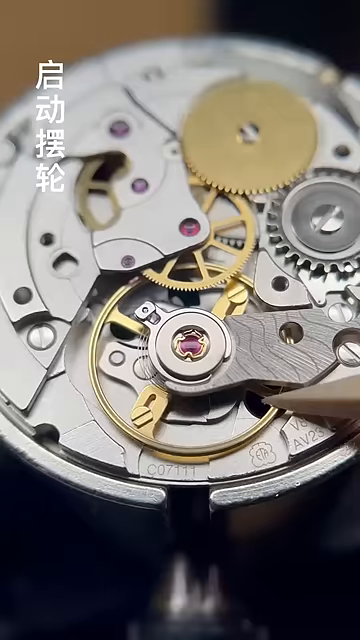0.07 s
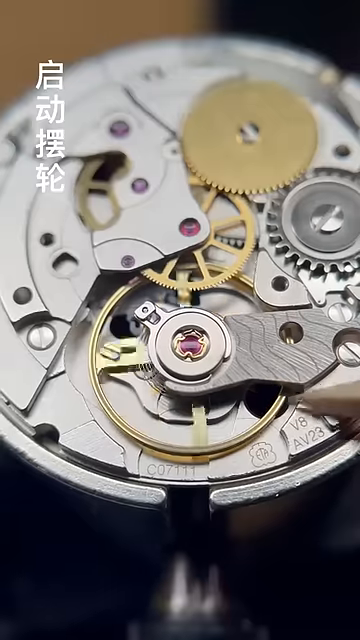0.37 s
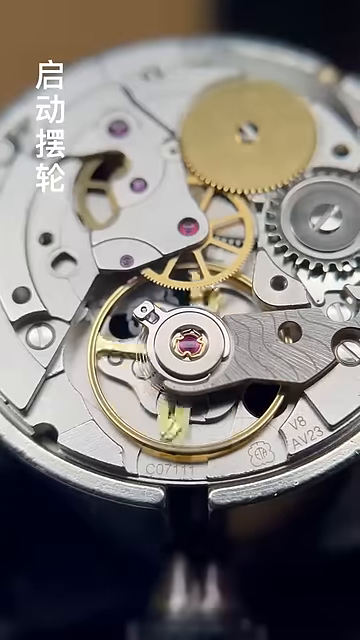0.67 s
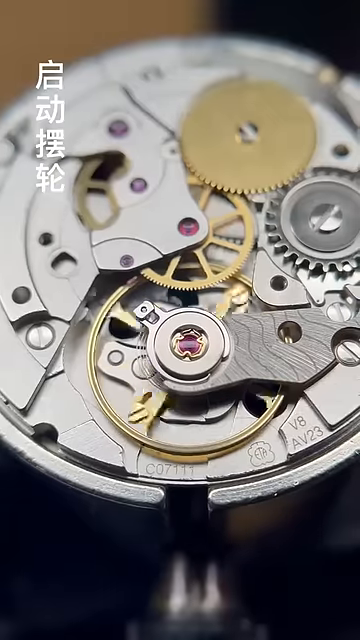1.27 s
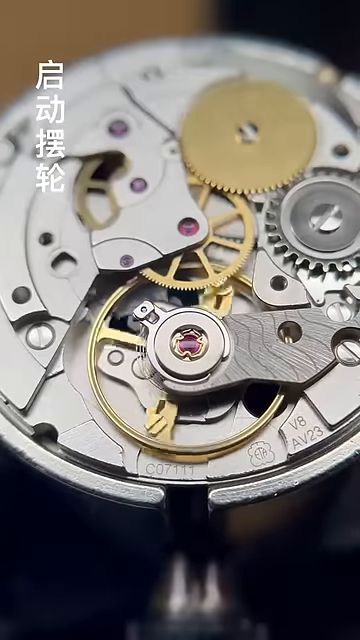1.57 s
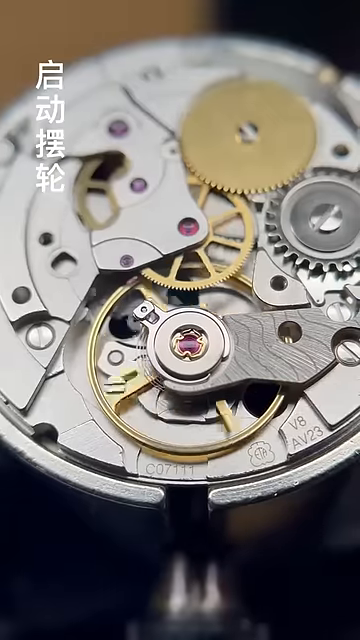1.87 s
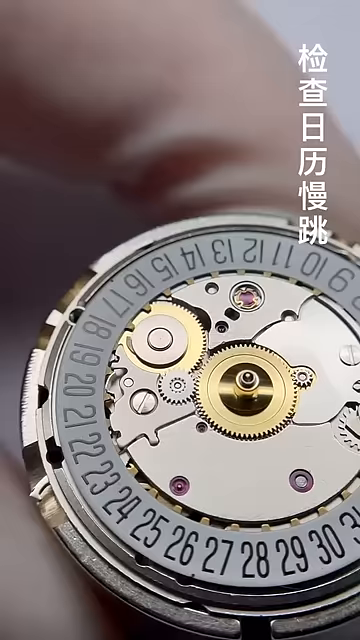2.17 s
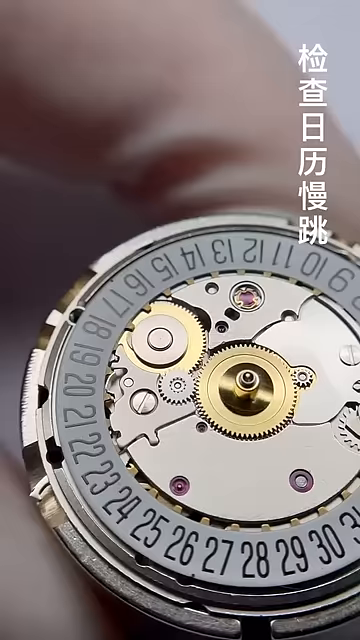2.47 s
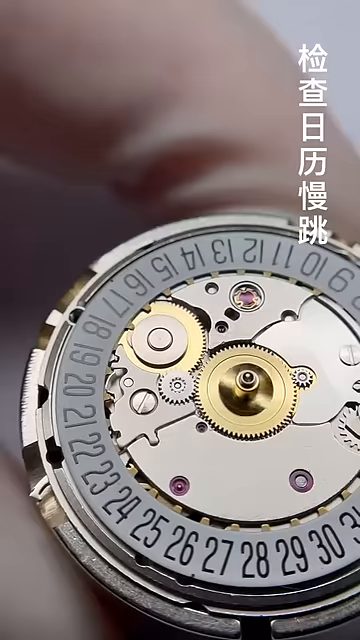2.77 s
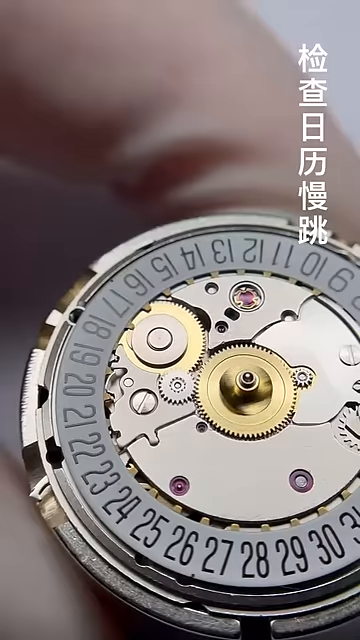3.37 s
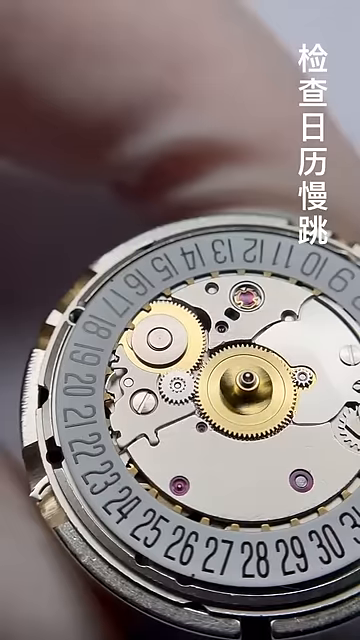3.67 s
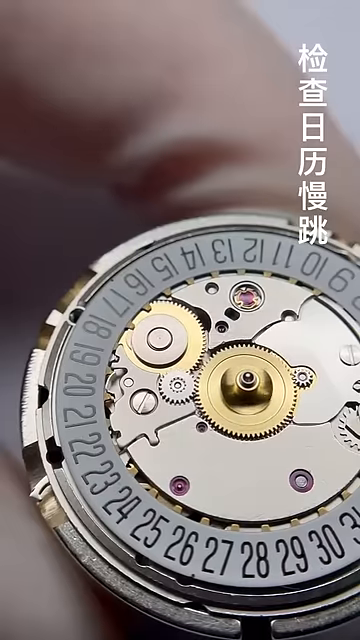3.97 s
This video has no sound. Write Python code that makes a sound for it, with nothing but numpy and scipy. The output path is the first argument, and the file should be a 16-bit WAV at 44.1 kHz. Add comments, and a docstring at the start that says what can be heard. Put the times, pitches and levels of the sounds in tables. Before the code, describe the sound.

A mechanical watch starts ticking, quick and metallic, over a faint hiss and hum. The ticking stops, and fingers turn the crown in five soft, scratchy strokes with dull handling bumps and two tiny snaps, close up in a quiet room.

```python
"""A quiet room, a watch movement on a pickup stand. A stick frees the balance; the escapement ticks six
times a second, each tick a double steel click with a thin spring ring, over the stand's resonant hiss
and faint mains hum. After a short silence the watch is in the hand: five finger strokes on the crown
turn the calendar gears, with soft double scrapes, handling rumble and two small snaps."""
import sys
import numpy as np
from scipy.fft import rfft, irfft, next_fast_len
from scipy.io import wavfile

SR = 44100
rng = np.random.default_rng(int(sys.argv[2]) if len(sys.argv) > 2 else 0)


def wav_out(sig):
    """Save sig, one row per channel (or a flat mono array), as 16-bit PCM at SR to the path in sys.argv[1]."""
    wavfile.write(sys.argv[1], SR, np.round(np.clip(np.atleast_2d(sig).T, -1, 1) * 32767).astype(np.int16))


N = 176400

# Ticks: (time [s], unlock [dB], wait for drop [s], drop [dB], rebound [dB], spring [dB],
# spring t60 scale [ratio], knock [dB])
TICKS = [(0.3753, -29, 0.012, -26.5, -38, -50, 0.67, -47),
         (0.5415, -32.5, 0.012, -30.5, -33.5, -53, .6, -42.5),
         (0.709, -30, .0114, -29.5, -39.5, -52.5, 0.99, -46),
         (0.876, -26, .0105, -29.5, -34.5, -58, 0.62, -51), (1.0427, -28, 0.01, -30, -34.5, -56.5, 1, -39),
         (1.2091, -33.5, 0.011, -28.5, -35.5, -55.5, 1, -36),
         (1.3761, -29.5, .0098, -35, -36.5, -51, 1, -43),
         (1.5431, -29, .0095, -30.5, -35.5, -54, 0.54, -46),
         (1.7092, -30, 0.0096, -30, -37.5, -49, 0.93, -47),
         (1.8763, -30.5, 0.0091, -33, -33.5, -51, .8, -44)]
# Movement on its stand: (frequency [Hz], level [dB], t60 [s], extra at tooth drop [dB])
MOVEMENT_MODES = [(2690, -17.5, 0.017, 2), (3010, -20, 0.015, -11), (3540, -24, 0.0068, 9),
                  (4340, -25, .012, -25), (4645, 7.5, 0.0095, -3.5), (4744, -14, 0.045, 1.5),
                  (5350, -24, 0.012, 12), (6405, -31, 0.029, 11), (7620, -25, 0.026, 5),
                  (8480, -24, 0.022, 1), (9530, -18.5, 0.014, 3.5), (10900, -25.5, 0.012, 1),
                  (12960, -28, .01, 11.5), (15250, -30, 0.013, 3)]
# Spring, calendar steel, case: (frequency [Hz], level [dB], t60 [s])
SPRING_MODES = [(7560, -2.5, 0.24), (7630, -13, 0.12), (6350, -11.5, 0.11), (9100, -12, 0.098),
                (9650, -11, 0.073), (4580, -2, .1), (15130, -19, 0.12)]
SNAP_MODES = [(8600, 7, 0.01), (9000, -13, .009), (9200, -14, .007), (7000, -19, .012), (13520, -6, .012),
              (14000, -14, .008)]
CASE_MODES = [(1400, -8.5, 0.011), (1830, -11.5, 0.0096), (2150, -16, .008), (2620, -4.5, .011),
              (3190, -3.5, 0.017), (3400, -16, 0.013), (5660, -13, 0.0094)]
# Crown strokes: (push centre [s], push [dB], push half width [s], wait for scrape [s], scrape [dB],
# run-out [dB])
STROKES = [(2.274, -62, 0.019, 0.056, -59.5, -68), (2.619, -59, 0.012, 0.059, -61.5, -71.5),
           (2.962, -61, 0.0084, 0.047, -61.5, -67), (3.314, -58, 0.0097, 0.051, -60.5, -75),
           (3.667, -61.5, 0.0082, 0.051, -61, -71)]
# Calendar snaps: (time [s], level [dB], case gain [dB], ring [Hz], ring gain [dB], crack gain [dB])
SNAPS = [(2.6913, -47, -30, 7770, -5, 1), (3.7727, -42.5, 2.5, 8200, -20, -15)]
# Crown catches, finger bumps on the case: (time [s], level [dB])
CATCHES = [(2.2795, -50.5), (2.622, -56), (2.9613, -54.5), (3.314, -56), (3.6675, -56)]
BUMPS = [(2.039, -55.5), (2.28, -43), (2.622, -44), (2.716, -53), (2.962, -50), (3.085, -51),
         (3.312, -51.5), (3.402, -45.5), (3.44, -50), (3.667, -50), (3.858, -55)]
# Rubs at the balance, touches on the metal: (centre [s], half width [s], level [dB])
BALANCE_RUBS = [(.36, 0.042, -56), (.43, 0.04, -58), (0.606, 0.051, -54.5)]
TOUCHES = [(.312, 0.015, -63), (2.145, 0.019, -77), (2.36, 0.027, -75), (3.07, 0.041, -76),
           (3.95, .03, -76)]
# Envelope of a soft low rush: (time [s], level [dB])
RUSH_ENVELOPE = [(0, -65.5), (.2, -61), (.5, -60), (.7, -62.5), (.95, -69), (1.4, -76), (2, -100)]
# Impact spectra: (frequency [Hz], gain [dB])
CRACK_EQ = [(1000, -30), (2300, -20), (2700, -24), (3350, -7), (3800, -2.5), (4600, -1), (5400, 2),
            (5900, -18), (7200, -17), (8000, -20), (9550, 5), (10200, -21), (11400, -18), (12150, -7),
            (12600, -10), (13100, -3), (14200, -26), (14750, 8.5), (15300, -10), (15700, -14)]
KNOCK_EQ = [(500, -40), (1100, -19), (2000, -3.5), (2400, -14), (2700, 5), (3300, -9), (3900, -5.5),
            (6000, -35), (12000, -35)]
CATCH_EQ = [(200, -3), (550, 5.5), (1300, -8), (2200, -13), (3400, -9), (4800, -15), (8700, -7),
            (14000, -20)]
BUMP_EQ = [(30, 5.5), (100, 2), (200, -11.5), (350, -24), (900, -28), (2500, -38), (6000, -60)]
# Friction spectra: (frequency [Hz], gain [dB])
PUSH_EQ = [(300, -2.5), (900, 6), (2200, -7), (3300, -8.5), (4800, -8), (7200, 2.5), (8000, -1),
           (8800, 5.5), (10800, -9), (13500, 0), (15400, -14)]
SCRAPE_EQ = [(1000, -9), (4800, -15), (6200, -7), (7300, 0.5), (7900, -7.5), (8700, -2), (10400, -9),
             (12600, -2.5), (13500, -1), (14400, -9), (15400, -7), (15900, -40)]
RUNOUT_EQ = [(3000, -2), (6500, -13), (7300, -9), (7800, -8), (8450, 7), (10000, -19), (12800, -34),
             (13700, 5), (15500, -29)]
BALANCE_RUB_EQ = [(1500, -21), (2400, -18), (2800, -1), (3400, -31), (4650, 7.5), (5450, -10), (6000, -28),
                  (8000, -30), (9500, -16), (10500, -36)]
TOUCH_EQ = [(700, -10), (1700, -14), (2500, -11), (2950, 0), (3400, -11), (4300, -14), (7000, -24.5),
            (14000, -29)]
# Background noise spectra: (frequency [Hz], gain [dB])
RUMBLE_EQ = [(8, 8.5), (25, 6.5), (45, -8.5), (80, -15), (160, -25.5), (300, -34), (1000, -50)]
RUSH_EQ = [(100, -17.5), (220, 0), (360, 2), (520, -1), (630, -6.5), (790, -4), (1100, -10.5),
           (1500, -13.5), (3000, -22.5), (6000, -41)]
STAND_EQ = [(25, 4.5), (55, -1), (80, -10.5), (150, -9.5), (300, -11), (620, -15), (760, -13.5),
            (950, -18.5), (1600, -18), (2400, -24), (2680, -16), (3150, -27), (4100, -19.5), (4650, -7),
            (5150, -19), (5450, -15), (5800, -29.5), (8500, -29.5), (9500, -27), (10100, -31.5),
            (15400, -32), (15800, -54)]
ROOM_EQ = [(60, -11), (200, -3), (290, -12.5), (520, -11.5), (750, -10.5), (1100, -16.5), (1600, -19),
           (2400, -25.5), (4200, -28.5), (5000, -26.5), (6000, -30.5), (15400, -33)]
# Stand hum and whine, room tones: (frequency [Hz], rms level [dB])
STAND_TONES = [(100, -73), (201, -78.5), (246, -81), (309, -82.5), (358, -84.5), (722, -81), (3246, -83),
               (4870, -73.5)]
ROOM_TONES = [(730, -85), (4870, -90.5)]

STAND_END_S, HAND_START_S = 2.006, 2.030
TOP_HZ, HISS_TOP_HZ = 16300, 15550
HIT_SAMPLES = 10000


def escapement():
    """The pallet unlocks; about 10 ms later a tooth drops, rebounds and rings a spring."""
    unlock_rise_s, drop_rise_s, crack_t60_s, rebound_s = .00098, .00059, .012, .0024
    unlock_modes = [(hz, db, t60_s) for hz, db, t60_s, _ in MOVEMENT_MODES]
    drop_modes = [(hz, db + extra_db, t60_s) for hz, db, t60_s, extra_db in MOVEMENT_MODES]
    out = np.zeros(N)
    for at_s, unlock_db, wait_s, drop_db, rebound_db, spring_db, t60_scale, knock_db in TICKS:
        unlock = ring(unlock_modes, unlock_rise_s) + amp(-15) * burst(CRACK_EQ, crack_t60_s)
        add(out, at_s, amp(unlock_db) * unlock)
        drop_s = at_s + wait_s
        for delay_s, db in [(0, drop_db), (rebound_s * rng.uniform(.99, 1.2), rebound_db)]:
            click = ring(drop_modes, drop_rise_s) + amp(-10.5) * burst(CRACK_EQ, crack_t60_s)
            add(out, drop_s + delay_s, amp(db) * click)
        detune = 1 + .0008 * rng.normal()
        spring_modes = [(hz * detune, db, t60_s * t60_scale) for hz, db, t60_s in SPRING_MODES]
        add(out, drop_s, amp(spring_db) * ring(spring_modes, drop_rise_s))
        add(out, drop_s, amp(knock_db) * burst(KNOCK_EQ, t60_s=.013))
    return out


def crown():
    """Per stroke: a short push with a soft catch, a longer gear scrape, a faint run-out."""
    runout_lag_s = .043
    push, scrape, runout = np.zeros((3, N))
    for at_s, push_db, half_width_s, wait_s, scrape_db, runout_db in STROKES:
        push += amp(push_db) * bell(at_s, half_width_s)
        scrape += amp(scrape_db) * bell(at_s + wait_s, half_width_s=.024)
        runout += amp(runout_db) * bell(at_s + wait_s + runout_lag_s, half_width_s=.026)
    out = push * friction(PUSH_EQ) + scrape * friction(SCRAPE_EQ) + runout * friction(RUNOUT_EQ)
    for at_s, db in CATCHES:
        add(out, at_s, amp(db) * burst(CATCH_EQ, t60_s=.023))
    return out


def calendar_snaps():
    """Small springs snap over a tooth and ring the case."""
    ring_t60_s = .041
    out = np.zeros(N)
    for at_s, db, case_db, ring_hz, ring_db, crack_db in SNAPS:
        steel = ring(SNAP_MODES + [(ring_hz, ring_db, ring_t60_s)], rise_s=.00026)
        case = amp(case_db) * ring(CASE_MODES, rise_s=.00023)
        crack = amp(crack_db) * burst(SCRAPE_EQ, t60_s=.0087)
        add(out, at_s, amp(db) * (steel + case + crack))
    return out


def handling():
    """Fingers press and let go at each stroke, with deep rumble and dull bumps."""
    release_lag_s, half_width_s = .085, .03
    press, effort = np.zeros((2, N))
    for at_s, *_ in STROKES:
        release_s = at_s + release_lag_s
        press += bell(at_s, half_width_s) - .5 * bell(release_s, half_width_s)
        effort += bell(release_s, half_width_s=.08)
    rumble = (amp(-51.5) + amp(-54) * effort) * noise(RUMBLE_EQ)
    out = amp(-38) * (press - press.mean()) + rumble
    for at_s, db in BUMPS:
        add(out, at_s, amp(db) * burst(BUMP_EQ, t60_s=.078))
    return out


def rubs(events, eq):
    """Brief dry friction of stick or fingers on metal, or at the starting balance."""
    envelope = sum(amp(db) * bell(at_s, half_width_s) for at_s, half_width_s, db in events)
    return envelope * friction(eq)


def stand():
    """Resonant pickup hiss, hum and a passing low rush."""
    rush_db = np.interp(clock(), *np.transpose(RUSH_ENVELOPE))
    rush = amp(rush_db) * noise(RUSH_EQ)
    hiss = amp(-62.5) * noise(STAND_EQ, top_hz=HISS_TOP_HZ)
    return hiss + tones(STAND_TONES) + rush


def room():
    """Steady room noise with two faint tones."""
    return amp(-68) * noise(ROOM_EQ, top_hz=HISS_TOP_HZ) + tones(ROOM_TONES)


def ring(modes, rise_s, scatter_db=.9):
    """Struck, damped modes; level and phase vary per blow."""
    t = clock(HIT_SAMPLES)
    waves = np.zeros(HIT_SAMPLES)
    for hz, db, t60_s in modes:
        decay = amp(db + scatter_db * rng.normal() - 60 * t / t60_s)
        waves += decay * np.sin(2 * np.pi * (hz * t + rng.random()))
    return waves * (1 - np.exp(-(t / rise_s) ** 2))


def burst(eq, t60_s, rise_s=.00041):
    """Decaying contact noise."""
    t = clock(HIT_SAMPLES)
    return noise(eq, HIT_SAMPLES) * amp(-60 * t / t60_s) * (1 - np.exp(-t / rise_s))


def friction(eq, slips_per_s=1400, slip_share=.55):
    """Tiny slips on a noise bed, through a part's resonances."""
    slips = unit_rms((rng.random(N) < slips_per_s / SR) * rng.standard_normal(N))
    force = np.sqrt(slip_share) * slips + np.sqrt(1 - slip_share) * rng.standard_normal(N)
    return equalise(force, eq, HISS_TOP_HZ)


def tones(rows):
    """Steady sines, random phase."""
    t = clock()
    return sum(amp(db) * np.sqrt(2) * np.sin(2 * np.pi * (hz * t + rng.random())) for hz, db in rows)


def noise(eq, size=N, top_hz=TOP_HZ):
    """Coloured noise, rms 1."""
    return equalise(rng.standard_normal(size), eq, top_hz)


def equalise(x, eq, top_hz):
    """x through a gain curve, cut at top_hz, rms 1."""
    fft_size = next_fast_len(len(x) + 8192)
    bins_hz = np.fft.rfftfreq(fft_size, 1 / SR)
    hz, db = np.transpose(eq)
    gain = amp(np.interp(np.log(bins_hz + 1), np.log(hz + 1), db)) * (bins_hz < top_hz)
    return unit_rms(irfft(rfft(x, fft_size) * gain, fft_size)[:len(x)])


def bell(centre_s, half_width_s):
    """Gaussian envelope."""
    return np.exp(-((clock() - centre_s) / half_width_s) ** 2)


def add(track, at_s, sound):
    """Mix in at a time."""
    part = track[max(round(at_s * SR), 0):][:len(sound)]
    part += sound[:len(part)]


def amp(db):
    """dB to gain."""
    return 10 ** (np.asarray(db) / 20)


def unit_rms(x):
    """Scale to rms 1."""
    return x / np.sqrt(np.mean(x ** 2) + 1e-20)


def clock(size=N):
    """Sample times [s]."""
    return np.arange(size) / SR


def scene():
    """Watch on the stand, short silence, watch in the hand. Mono."""
    t = clock()
    fade_s = .003
    stand_gate = np.clip((STAND_END_S - t) / fade_s + 1, 0, 1)
    hand_gate = np.clip((t - HAND_START_S) / fade_s, 0, 1)
    on_stand = escapement() + rubs(BALANCE_RUBS, BALANCE_RUB_EQ) + stand()
    in_hand = crown() + calendar_snaps() + handling() + room()
    return (on_stand * stand_gate + in_hand * hand_gate + rubs(TOUCHES, TOUCH_EQ))[None]


def record(dry):
    """Brick-wall low-pass at TOP_HZ."""
    fft_size = next_fast_len(N + 8192)
    passband = np.fft.rfftfreq(fft_size, 1 / SR) < TOP_HZ
    return irfft(rfft(dry, fft_size) * passband, fft_size)[..., :N]


dry = scene()
out = record(dry)
wav_out(out)
```